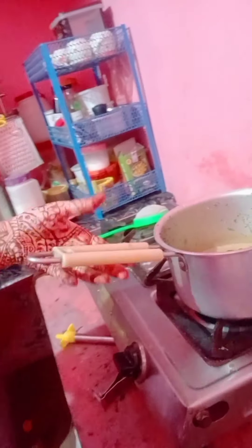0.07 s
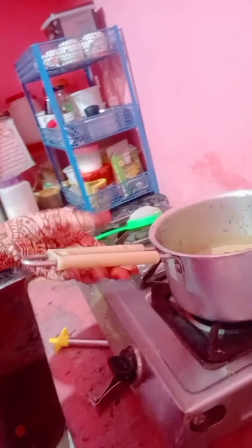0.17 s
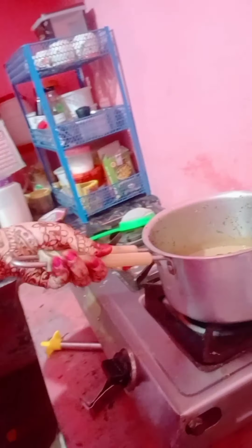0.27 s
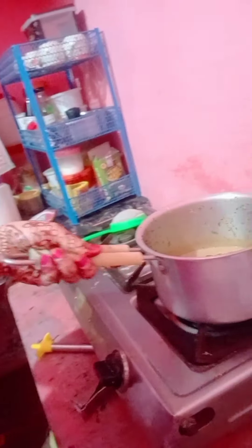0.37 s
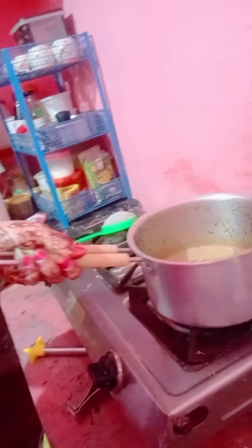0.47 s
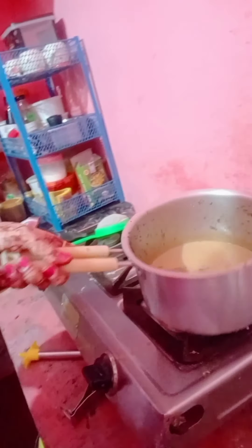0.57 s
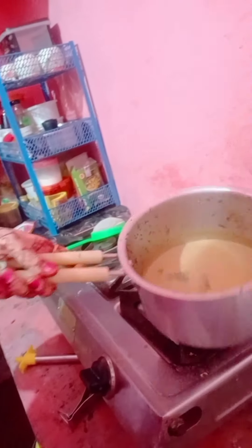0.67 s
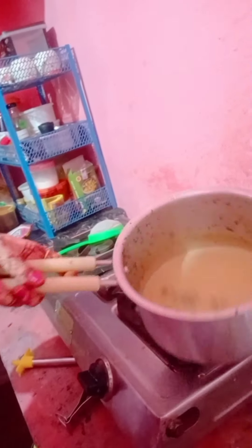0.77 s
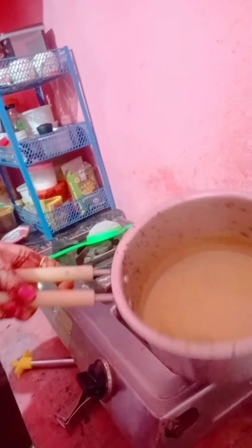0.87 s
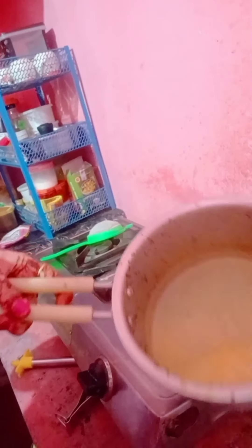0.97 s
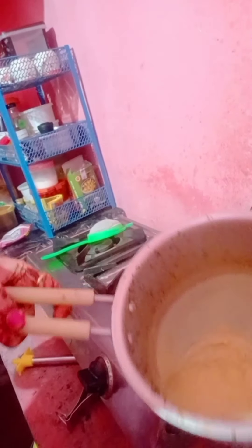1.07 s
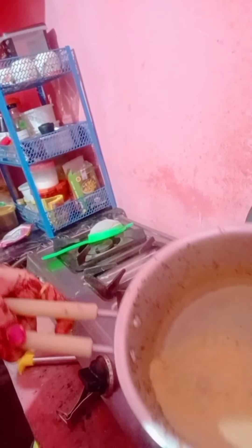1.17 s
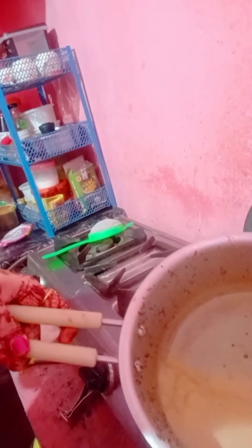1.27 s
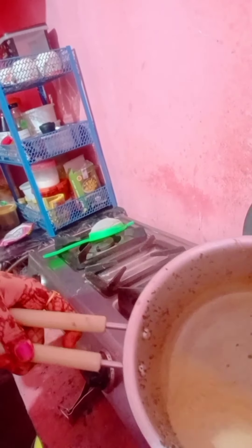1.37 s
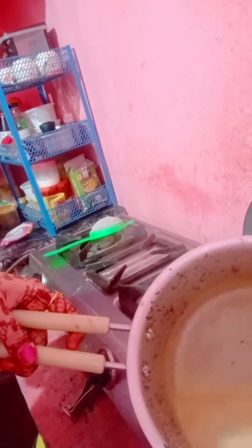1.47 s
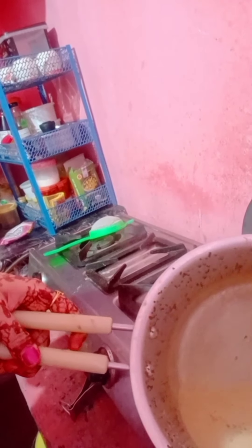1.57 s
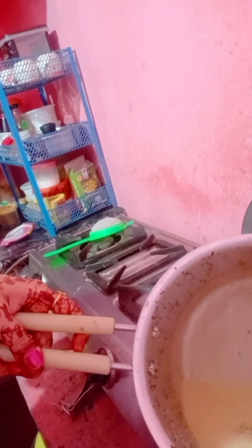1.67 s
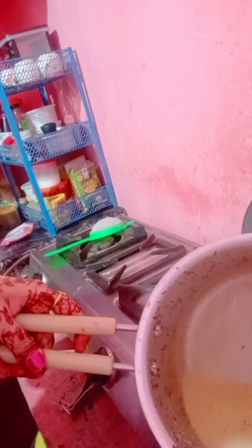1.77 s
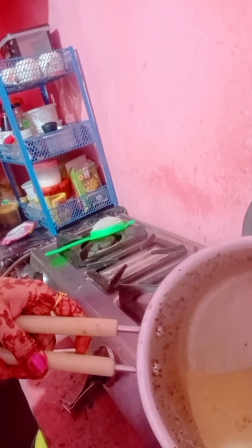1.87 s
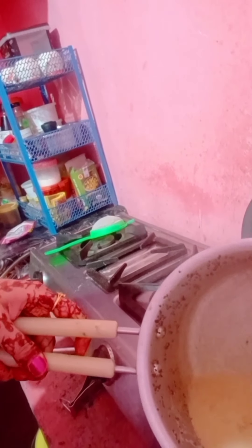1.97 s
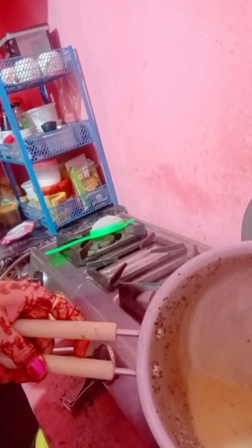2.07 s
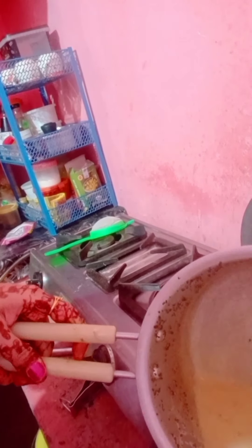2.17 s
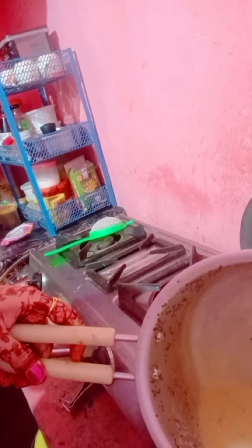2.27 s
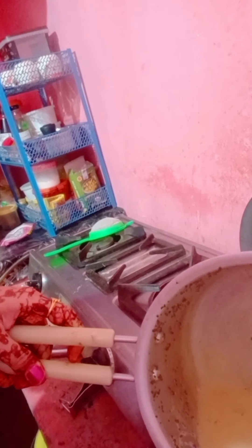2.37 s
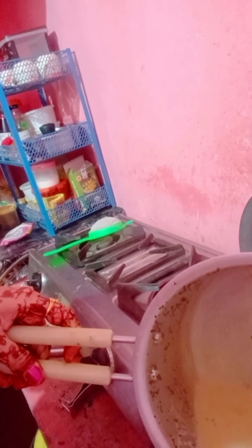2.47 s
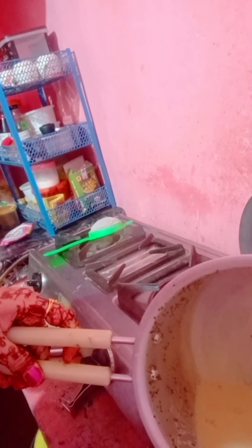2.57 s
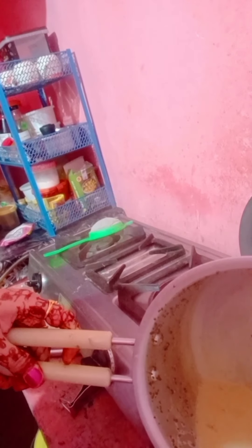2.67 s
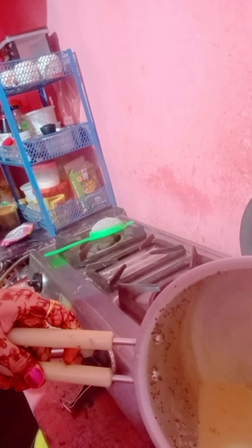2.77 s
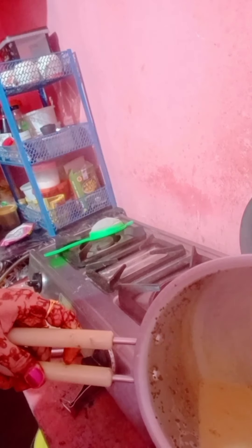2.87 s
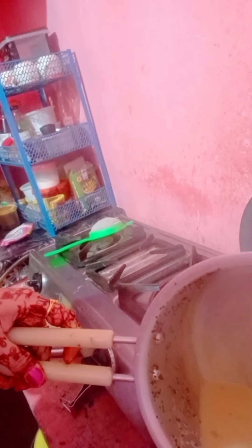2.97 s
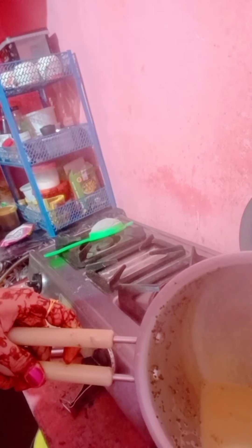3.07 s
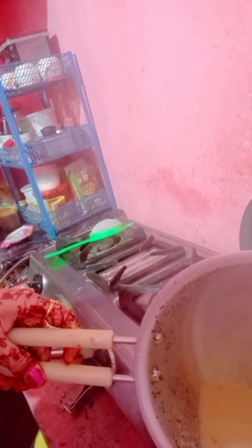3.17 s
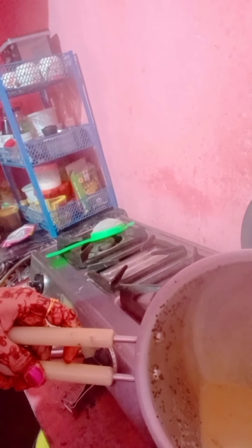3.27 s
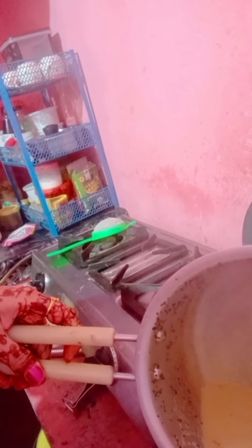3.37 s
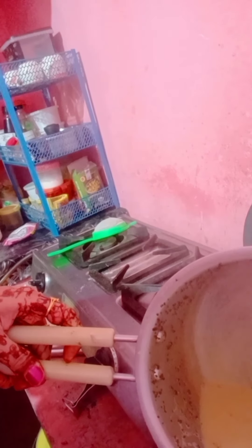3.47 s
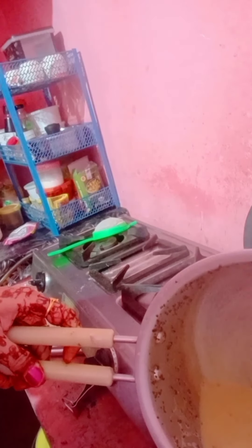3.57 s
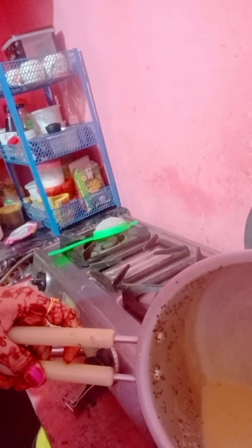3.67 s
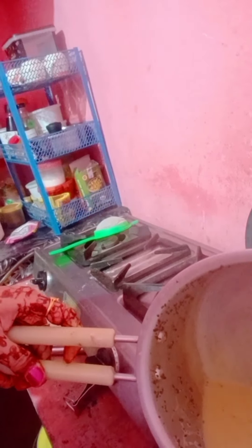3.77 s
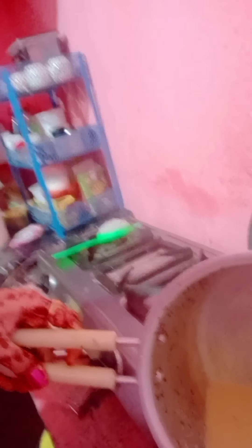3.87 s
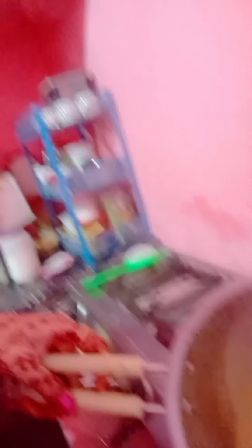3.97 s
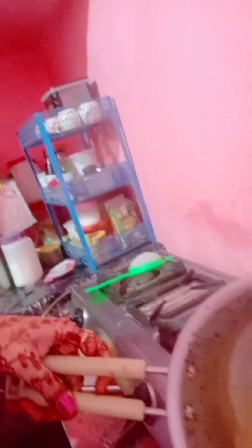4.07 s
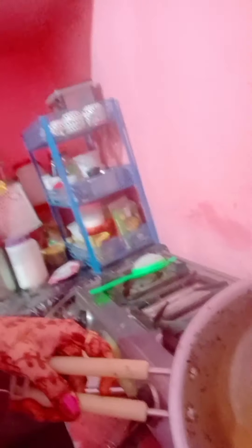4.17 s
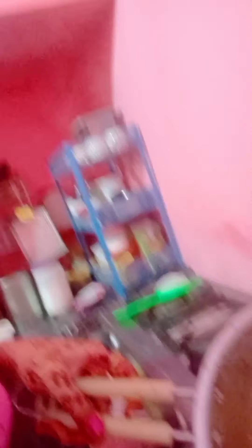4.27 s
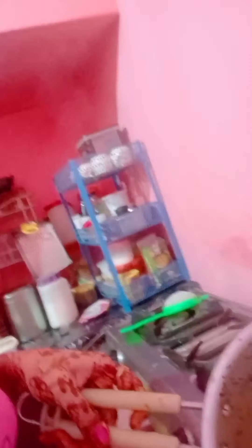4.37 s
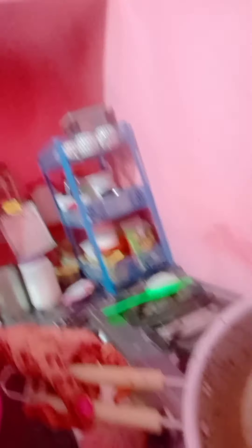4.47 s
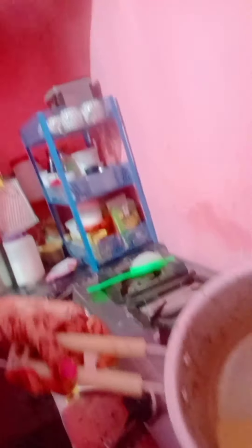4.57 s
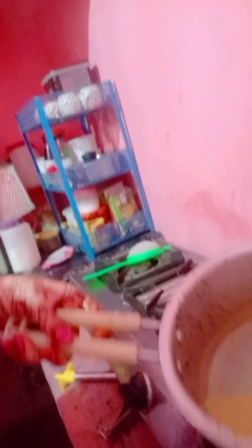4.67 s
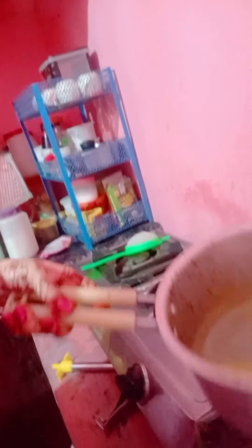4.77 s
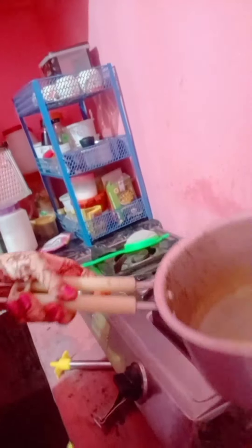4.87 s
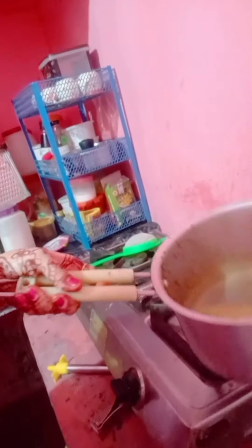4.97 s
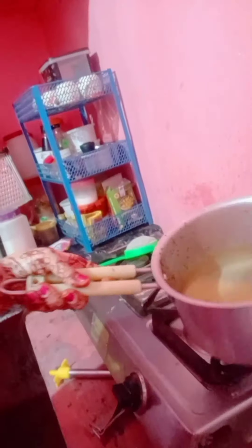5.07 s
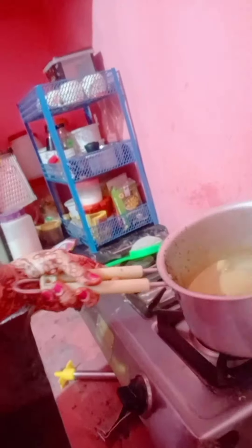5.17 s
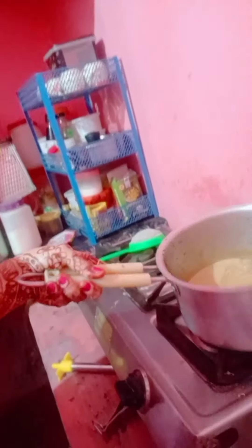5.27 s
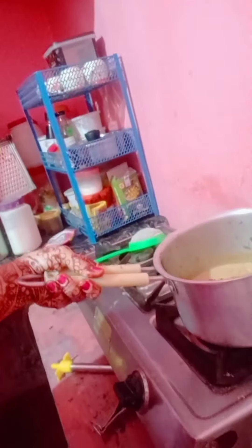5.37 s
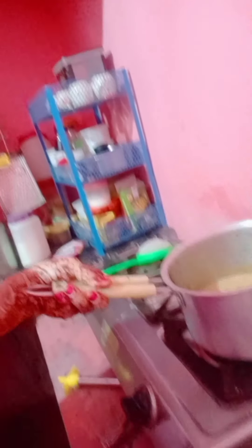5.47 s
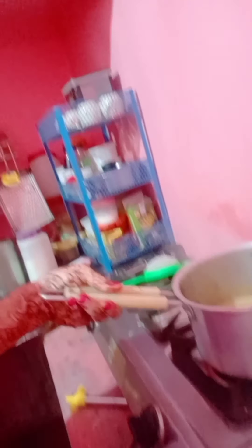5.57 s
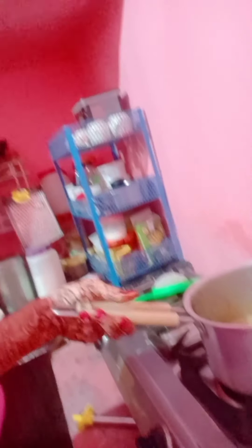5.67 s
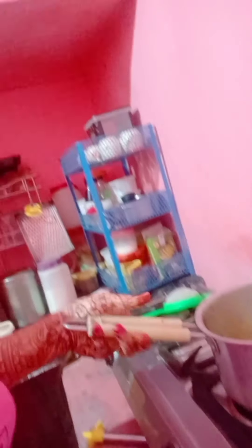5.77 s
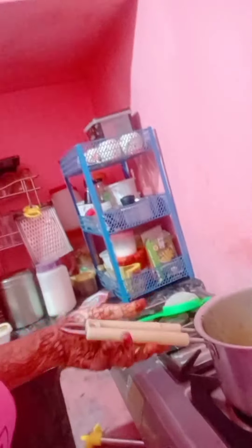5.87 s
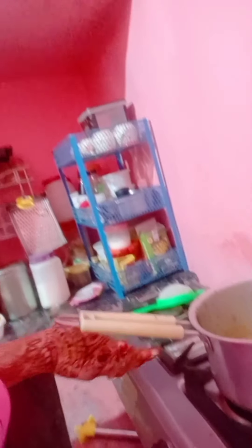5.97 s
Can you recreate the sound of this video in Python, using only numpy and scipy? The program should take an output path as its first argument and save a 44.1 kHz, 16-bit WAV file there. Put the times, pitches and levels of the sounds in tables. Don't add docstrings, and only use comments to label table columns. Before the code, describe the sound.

In a small, hard-walled kitchen, a full metal pot is tugged with hard clanks and scraped off an iron stove grate. A few quiet seconds follow, with soft sleeve rustles, bangle and tong ticks close to the phone, over a low wavering fan hum. Then the pot bangs down loudly on the stove, bounces, scrapes briefly and settles with bright knocks.

```python
import sys
import numpy as np
from scipy import signal
from scipy.fft import rfft, irfft, next_fast_len
from scipy.io import wavfile
from scipy.ndimage import uniform_filter1d

SR = 44100
rng = np.random.default_rng(int(sys.argv[2]) if len(sys.argv) > 2 else 0)


def to_linear_factor(level_db):
    exponent = np.asarray(level_db, float) / 20
    return 10 ** exponent


def transcribe(u):
    v = np.clip(np.atleast_2d(u).T, -1, 1)
    q = np.round(v * 32767).astype(np.int16)
    wavfile.write(sys.argv[1], SR, q)


N = 265041
T = np.arange(N) / SR


def unit(x):
    return x / np.sqrt(np.mean(x ** 2) + 1e-30)


def peak_unit(x):
    return x / np.abs(x).max()


def band(x, lo_hz, hi_hz):
    return signal.sosfilt(signal.butter(2, [lo_hz, hi_hz], "bandpass", fs=SR, output="sos"), x)


def ring(x, hz, width_hz):
    return signal.lfilter(*signal.iirpeak(hz, hz / width_hz, fs=SR), x)


def shape(x, points):
    hz, db = np.transpose(points)
    size = next_fast_len(x.shape[-1])
    f = np.maximum(np.arange(size // 2 + 1) * SR / size, 1)
    gain = to_linear_factor(np.interp(np.log(f), np.log(hz), db))
    return irfft(rfft(x, size) * gain, size)[..., :x.shape[-1]]


def walk(rate):
    k = int(SR / rate)
    steps = np.repeat(rng.standard_normal(N // k + 1), k)
    return 0.84 * uniform_filter1d(uniform_filter1d(steps, k), k)[:N]


def grains(rate, spread_db):
    hits = rng.random(N) < rate / SR
    return unit(hits * rng.standard_normal(N) * to_linear_factor(spread_db * rng.exponential(size=N)))


def decay(t, t60):
    return np.exp(-np.log(1000) * t / t60)


def swell(s, length_s, rise_s, fall_s):
    return np.exp(-np.maximum(s - T, 0) / rise_s - np.maximum(T - s - length_s, 0) / fall_s)


def add(out, s, x, pan_db):
    i = int(s * SR)
    x = x[:N - i]
    out[:, i:i + len(x)] += x * to_linear_factor([[pan_db / 2], [-pan_db / 2]])


# (frequency [Hz], density [dB per Hz])
AIR_COLOUR = [(15, -62.5), (25, -9.5), (54, -16.5), (128, 1.5), (237, -15.5), (363, -8), (462, -15),
              (978, -19), (1120, -15.5), (1580, -27.5), (2700, -26.5), (3540, -38.5), (6720, -33),
              (7600, -41.5), (7850, -68)]
# (frequency [Hz], width [Hz], level [dB rms])
CASING_MODES = [(69, 15, -102), (111.7, 9.9, -74.5), (138.2, 8.3, -65.5), (300, 16, -78),
                (383.3, 22, -83.5), (877, 6.9, -80), (1162, 71, -81), (1247, 11, -83.5), (1437, 39, -84),
                (2148, 50, -93.5), (2644, 50, -87.5)]


def air():
    mid, side = shape(rng.standard_normal((2, N)), AIR_COLOUR)
    gain = to_linear_factor(-63 - 3.5) / np.sqrt(np.mean(band(mid, 170, 8000) ** 2))
    side = gain * shape(side, [(100, -9), (300, -8.5), (1000, 2.0), (4000, 0.5)])
    mid = gain * mid
    for hz, width, db in CASING_MODES:
        tone = unit(ring(ring(rng.standard_normal(N), hz, width), hz, width))
        mid = mid + to_linear_factor(db + 2 * walk(9.6)) * tone
    both = np.array([to_linear_factor(0.76) * (mid + side), to_linear_factor(-1.0) * (mid - side)])
    flutter = 0
    for hz in (250, 400, 640, 1020, 1640, 2600, 4200):
        flutter = flutter + (to_linear_factor(2.2 * walk(9)) - 1) * band(both, hz, hz * 1.6)
    both = to_linear_factor(0.7 * walk(3)) * (both + flutter)
    mode_hz = np.arange(300, 8000, 45)
    depth_db = 3.0 * np.clip(mode_hz / 1500 - 0.2, 0, 1)
    sway = 2.5 * walk(2.5)
    one, two = (shape(both, np.transpose([mode_hz, depth_db * rng.standard_normal(len(mode_hz))]))
                for _ in range(2))
    return to_linear_factor(-0.67) * (np.cos(sway) ** 2 * one + np.sin(sway) ** 2 * two)


# (time [s], length [s], level [dB])
DRONE = [(1.137, 0.082, -58), (1.318, 0.085, -52), (1.57, 0.023, -57.5), (1.666, 0.16, -54),
         (1.864, 0.083, -54.5), (2.017, 0.036, -68), (2.177, 0.15, -56), (2.397, 0.1, -58.5),
         (2.565, 0.033, -56.5), (2.782, 0.082, -58), (3.001, 0.026, -63), (3.129, 0.066, -54),
         (3.31, 0.12, -53.5), (3.651, 0.11, -52.5), (3.804, 0.067, -55), (3.928, 0.093, -60),
         (4.049, 0.027, -55), (4.286, 0.074, -57), (4.417, 0.025, -52), (4.63, 0.059, -52.5),
         (4.786, 0.033, -56.5), (4.987, 0.068, -54.5), (5.143, 0.13, -57)]
# (time [s], length [s], level [dB], pitch [Hz])
DRONE_SHAKEN = [
    (0.086, 0.14, -50, 114.9),
    (0.363, 0.087, -51.5, 120.9),
    (0.521, 0.18, -59, 113.8),
    (0.757, .28, -56, 119.5),
    (5.338, 0.024, -56.5, 122),
    (5.504, 0.07, -47.5, 111.8),
    (5.606, .18, -53, 137.4),
    (5.949, 0.044, -58, 122),
]


def drone():
    swells = sorted([row + (122,) for row in DRONE] + DRONE_SHAKEN)
    s, length, _, hz = np.transpose(swells)
    pitch_hz = np.interp(T, s + length / 2, hz) + 1.53 * walk(16)
    phase = 2 * np.pi * np.cumsum(pitch_hz) / SR
    size = sum(to_linear_factor(db) * swell(s, length, 0.01, 0.0067) for s, length, db, _ in swells)
    lag_rad = np.array([[0.2], [0]])
    tone = np.sqrt(2) * np.sin(phase - lag_rad) * size * to_linear_factor(4.2 * walk(35) + 1.0)
    return tone * to_linear_factor([[0.8], [-0.8]])


# (frequency [Hz], t60 [s])
ROOM = [(150, 0.58), (400, 0.24), (1000, 0.17), (2500, 0.23), (5000, 0.18), (10000, 0.031)]
# (frequency [Hz], level [dB])
TAIL_WIDTH = [(60, -30.5), (150, -7.5), (300, -7.5), (600, -2), (1200, 1.5), (4000, 2.5), (12000, 10)]


def kitchen(x, wet_db, pan_db):
    t = T[:SR // 2]
    tail = 0
    for hz, t60 in ROOM:
        octave = band(rng.standard_normal((2, len(t))), hz / 1.69, hz * 1.39)
        tail = tail + octave / np.sqrt(hz * t60) * decay(t, t60)
    tail = tail * (1 - np.exp(-t / 0.00032)) / np.sqrt(np.sum(tail[0] ** 2))
    tail = rfft(tail[0] + shape(tail[1], TAIL_WIDTH) * np.array([[1], [-1]]))
    power = np.abs(tail) ** 2 + 1e-12
    even = uniform_filter1d(power.mean(axis=0), size=300) / uniform_filter1d(power, size=16, axis=1)
    tail = irfft(tail * np.sqrt(even), len(t))[:, :len(t) * 4 // 5]
    tail = tail * to_linear_factor([[pan_db], [-pan_db]])
    wet = signal.fftconvolve(x.mean(axis=0, keepdims=True), tail, axes=1)[:, :N]
    return x + to_linear_factor(wet_db) * wet


# (time [s], length [s], level [dB], fall [s])
RUMBLE = [
    (0.047, 0.25, -53, 0.044),
    (0.368, 0.38, -54.5, 0.12),
    (5.419, 0.0093, -39.5, 0.12),
    (5.57, 0.054, -56, 0.12),
]


def rumble():
    shudder = unit(band(band(rng.standard_normal(N), 93, 140), 48, 117))
    return shudder * sum(to_linear_factor(db + 1.0) * swell(s, length, 0.0077, fall_s) for s, length, db, fall_s in RUMBLE)


# (time [s], length [s], level [dB], duller part [dB])
RUSTLE = [(0.967, 0.11, -70.5, 4.5), (1.16, 0.12, -73, 9), (1.49, 0.18, -72, 8), (1.77, 0.22, -75.5, 10.5),
          (2.174, 0.27, -75, 11.5), (2.695, 0.03, -67, 2), (2.756, 0.22, -74, 9.5),
          (3.115, 0.23, -73, 11.5), (3.426, 0.082, -70, 13.5), (3.626, 0.083, -71.5, 10),
          (3.808, 0.12, -77, 14.5), (4.014, 0.099, -63, 5.5), (4.168, 0.093, -71.5, 7),
          (4.532, 0.031, -67, 5), (4.615, 0.089, -81.5, 14), (5.845, 0.056, -71.5, 24),
          (5.946, 0.042, -71, 14)]


def rustle():
    bright, dull = 0, 0
    for s, length, db, dull_db in RUSTLE:
        move = to_linear_factor(db) * swell(s, length, 0.024, 0.032)
        bright = bright + move
        dull = dull + move * to_linear_factor(dull_db - 5.5)
    one, two = (bright * unit(band(band(fibres, 4030, 7370), 3700, 7900)) + dull * unit(band(fibres, 1250, 2520))
                for fibres in (grains(4000, 1.6), grains(4000, 1.6)))
    return to_linear_factor(-5.5) * shape(np.array([one, 0.055 * one + 1.14 * two]), [(7600, 0), (7850, -18)])


# (time [s], level [dB peak], pitch [Hz], t60 [s])
BUMPS = [(0.099, -47, 505, 0.19), (0.461, -52, 333, 0.14), (1.208, -62, 398, 0.1), (1.588, -60, 631, 0.11),
         (3.48, -56.5, 533, 0.028), (3.639, -58, 530, 0.25), (4.069, -56, 467, 0.049),
         (4.179, -52, 434, 0.066), (4.533, -56, 207, 0.046), (4.545, -55.5, 70, 0.071),
         (4.89, -69, 70, .08)]
# (time [s], level [dB peak], pitch [Hz], t60 [s])
LOW_RING = [
    (0.072, -41, 347, 0.15),
    (0.214, -34.5, 366, 0.051),
    (0.348, -39.5, 376, 0.061),
    (0.621, -34, 377, 0.15),
    (5.564, -23.5, 348, 0.066),
    (5.714, -32, 338, 0.036),
    (5.765, -57, 360, 0.13),
]


def bumps():
    out, t = np.zeros((2, N)), T[:8000]
    for table, relative_width in ((BUMPS, 0.4), (LOW_RING, 0.08)):
        for s, db, hz, t60 in table:
            bump = ring(rng.standard_normal(len(t)), hz, hz * relative_width)
            bump = bump * decay(t, t60) * (1 - np.exp(-t / 0.0025))
            add(out, s, to_linear_factor(db - 0.5) * peak_unit(bump), 1.5)
    return out


# (time [s], level [dB peak], pitch [Hz])
TICKS = [
    (1.2065, -48, 1600),
    (1.5888, -61, 1660),
    (2.6938, -54.5, 2230),
    (3.4569, -59, 2250),
    (3.6584, -52.5, 1210),
    (4.0888, -74, 1650),
    (4.566, -51.5, 3000),
]
# (time [s], level [dB peak], pitch [Hz])
PINGS = [(0.9627, -54.5, 4840), (2.7243, -62, 5500), (2.9693, -57, 5300), (3.1164, -62, 3780),
         (3.4685, -57, 4200), (3.7124, -60, 4730), (3.8748, -48.5, 4445), (3.955, -58, 6200),
         (4.0935, -58, 3970), (4.5184, -62, 4400), (5.1292, -61, 6900)]
# (time [s], level [dB peak], pitch [Hz])
SNAPS = [(3.4905, -46.5, 7000), (4.015, -43.5, 6000), (4.0465, -43.5, 5900), (4.2044, -48, 7500),
         (3.469, -48, 7000), (4.093, -52, 6960)]
# (time [s], level [dB peak], pitch [Hz])
CREAKS = [(2.9327, -58, 6440), (3.2261, -76, 3160), (3.2495, -57, 3770), (3.3867, -60, 4710),
          (3.421, -64, 3880), (3.6232, -63, 6540), (3.6576, -63, 3760), (3.857, -70, 4116),
          (4.1225, -67, 3130), (4.151, -57, 5390), (4.5794, -74, 3060)]


def ticks():
    out, t = np.zeros((2, N)), T[:8000]
    # table, band edges as parts of the pitch, t60 [s], share of pure tone
    kinds = ((TICKS, 0.6, 1.7, 0.016, 0.15), (PINGS, 0.75, 1.35, 0.016, 0.08),
             (SNAPS, 0.3, 1.9, 0.012, 0.05), (CREAKS, 0.65, 1.5, 0.01, 0.1))
    for table, below, above, t60, tone in kinds:
        for s, db, hz in table:
            fade = decay(t, t60)
            snap = rng.standard_normal(len(t)) * fade ** 1.6 + 5.6 * (t == 0)
            snap = band(band(snap, hz * below, hz * above), hz * below, hz * above)
            note = np.sin(2 * np.pi * hz * t) * fade * tone
            add(out, s - 0.0003, to_linear_factor(db + 6.5) * (note + 0.46 * peak_unit(snap)), 1.5)
    return out


# (time [s], level [dB peak],
# pitch [Hz], t60 [s])
RINGS = [(0.054, -30.5, 1250, 0.097), (0.051, -31.5, 790, 0.12), (0.054, -47, 1500, 0.08),
         (0.0817, -36, 533, 0.28), (0.07, -40.5, 339, 0.52), (0.199, -40, 2200, 0.07),
         (0.206, -40, 1100, 0.07), (0.24, -47, 2420, 0.078), (0.24, -47.5, 2090, .08),
         (0.329, -31, 780, 0.18), (0.33, -42, 1270, 0.12), (0.77, -35.5, 1075, .09),
         (0.74, -66, 3270, 0.25), (5.407, -33.5, 770, 0.11), (5.408, -20.5, 800, 0.13),
         (5.41, -25, 600, 0.2), (5.432, -22, 620, 0.3), (5.42, -35, 520, 0.3), (5.415, -35.5, 290, 0.29),
         (5.42, -29.5, 1670, 0.18), (5.412, -37, 1200, .08), (5.41, -42, 3600, .15), (.33, -37, 1700, 0.09),
         (5.407, -29, 1250, .05), (5.41, -33, 1840, .25), (5.41, -43, 2900, 0.3), (5.482, -25.5, 2160, .1),
         (5.483, -42, 2600, .05), (5.508, -38, 2300, .08), (5.487, -38.5, 3610, 0.12),
         (5.493, -31, 830, 0.083), (5.505, -26, 620, 0.12), (5.55, -39, 930, .1), (5.575, -29.5, 377, 0.12),
         (5.7145, -19.5, 2090, 0.075), (5.713, -22.5, 2700, 0.049), (5.713, -25, 1656, 0.059),
         (5.716, -34.5, 310, 0.26), (5.741, -28.5, 2440, 0.096), (5.752, -21, 2100, 0.05),
         (5.762, -38, 314, 0.089), (5.815, -42, 2120, .08), (5.875, -52, 2600, 0.14),
         (.095, -46.5, 165, .3), (.21, -47, 180, 0.34), (.78, -51, 160, 0.31), (5.53, -40.5, 170, 0.35),
         (0.328, -38.5, 1940, 0.087), (0.435, -37.5, 770, .08), (0.47, -43, 1100, .08),
              (0.565, -47, 1400, .08), (0.6, -51.5, 2250, .12), (0.625, -53, 2200, .1),
              (0.687, -41, 730, .07), (0.707, -40, 990, .07), (0.77, -34, 760, 0.084),
              (0.8, -41.5, 1080, .08), (0.772, -47, 1900, .07), (5.546, -36, 2900, 0.051),
              (5.572, -34, 2000, .08), (5.592, -37, 1300, .07), (5.6, -34, 380, 0.14),
              (5.736, -29.5, 1060, 0.074), (5.728, -39, 3380, .12), (5.715, -41, 3680, .15),
              (5.715, -46, 4900, .17), (5.716, -44, 5500, .15), (5.74, -43, 4300, 0.11),
              (5.79, -40, 940, .12), (5.73, -38, 560, .16), (0.67, -43, 690, .08), (0.41, -42, 300, .12),
              (0.63, -44.5, 410, .2)]
# (time [s], level [dB peak], pitch [Hz])
TINKS = [(1.176, -61, 6900), (1.207, -54, 2400), (1.208, -54, 1750), (1.214, -62, 2000), (1.241, -64, 2720),
         (1.242, -70, 5200), (1.592, -66, 4600), (2.75, -63, 2800), (2.855, -64, 4800), (2.894, -68, 4900),
         (3.115, -60, 3700), (3.288, -63, 4600), (3.29, -62, 2680), (3.32, -61, 2300), (2.705, -63, 2200),
         (2.97, -64, 4900), (4.566, -62, 3800), (1.09, -66, 4500), (3.454, -65, 4000), (3.874, -57, 4250),
         (3.957, -60, 6400), (4.533, -64, 3500), (4.534, -68, 5000), (4.26, -70, 6400)]


def rings():
    out, t = np.zeros((2, N)), T[:SR // 2]
    for s, db, hz, t60 in RINGS + [tink + (0.028,) for tink in TINKS]:
        pair = np.sin(2 * np.pi * hz * t) + 0.19 * np.sin(2 * np.pi * hz * 1.03 * t)
        add(out, s, to_linear_factor(db) * pair * decay(t, t60) * (1 - np.exp(-t / 0.002)), 1.2)
    return out


# (time [s], level [dB peak])
CRACKS = [
    (0.057, -43),
    (0.327, -56),
    (5.404, -38.5),
    (5.71, -42.5),
]


def cracks():
    out, t = np.zeros((2, N)), T[:SR // 2]
    for s, db in CRACKS:
        crack = band(rng.standard_normal(len(t)) * np.exp(-t / 0.0012), 7500, 12500)
        add(out, s, to_linear_factor(db) * peak_unit(crack), 1.0)
    return out


# (frequency [Hz], density [dB per Hz])
SHEET = [(88, -72.5), (150, 19.5), (221, -4), (371, 8), (459, -3.5), (612, -4), (661, -2.5), (802, -2),
         (1460, -10), (2100, -21), (3890, -27), (5610, -25.5), (15000, -48.5)]
# (time [s], level [dB])
SLIDE = [
    [(0.49, -52), (0.545, -50), (0.562, -41.5), (0.6, -39), (0.63, -43.5), (0.67, -41.5), (0.716, -39),
     (0.762, -43.5), (0.8, -43.5), (0.86, -60)],
    [(5.51, -48), (5.546, -29.5), (5.598, -26.5), (5.662, -62), (5.7, -36)],
]
# (frequency [Hz], width [Hz], level [dB])
SLIDE_BODY = [
    [(371, 30, 9.5), (560, 58, 9), (765, 80, 13.5), (935, 61, 6), (1490, 48, -2), (2140, 150, -5)],
    [(610, 45, -9), (370, 21, 5.5), (794, 26, -10), (1000, 120, -28), (1250, 43, -29), (1300, 31, -14),
     (2090, 1000, -11), (2080, 240, -21), (2980, 22, -18)],
]
# (grit at start [dB], grit slope [dB per s], boom at
# start [dB], boom slope [dB per s])
SLIDE_WEAR = [
    (-2.5, -69, 2, -48),
    (-11, -33, -4, 8),
]
# (frequency [Hz], width [Hz], level [dB])
GRIT = [(2940, 290, -9), (3690, 26, 1.5), (4320, 43, 0), (5000, 61, -6), (6300, 390, -6), (6750, 88, -19)]


def slide():
    clicks, sand = grains(2500, 1.5), grains(4000, 2.2)
    rim = unit(sum(to_linear_factor(db) * ring(sand, hz, 2.0 * width) for hz, width, db in GRIT))
    grit = rim + to_linear_factor(-4.5) * unit(band(sand, 3700, 7000))
    out, judder_db = 0, 1.5 * walk(70)
    for path, peaks, (grit_db, grit_slope, boom_db, boom_slope) in zip(SLIDE, SLIDE_BODY, SLIDE_WEAR):
        s, db = np.transpose(path)
        since = np.clip(T - s[0], 0, s[-1] - s[0])
        body = unit(sum(to_linear_factor(peak_db) * ring(clicks, hz, width) for hz, width, peak_db in peaks))
        body = body + to_linear_factor(-3) * unit(band(shape(clicks, SHEET), 300, 3000))
        boom = to_linear_factor(boom_db + boom_slope * since) * unit(band(body, 227, 460))
        body = unit(band(body, 506, 2000)) + boom
        gate = np.interp(T, [s[0], s[0] + 0.03, s[-1] - 0.02, s[-1]], [0, 1, 1, 0])
        pressure = gate * to_linear_factor(np.interp(T, s, db) - 8.5 + judder_db)
        out = out + pressure * (body + to_linear_factor(grit_db + grit_slope * since - 6.5) * grit)
    return out * to_linear_factor([[1.1], [-1.1]])


def blows(table, modes, ring_scale, dense_db, dense_t60, crack_s, lead_db, lead_t60, trim_db, pan_db,
          late_s, rattle_s):
    out, t = np.zeros((2, N)), T[:SR // 2]
    hz, width, db = np.array(modes).T[:, :, None]
    for s, peak_db, clang_db, crack_db, lead_hz in table:
        luck = rng.standard_normal((2, len(modes), 1))
        fade = np.exp(-np.pi * np.maximum(width, 35) * ring_scale * t)
        swing = np.sin(2 * np.pi * hz * (1 + 0.014 * luck[1]) * t) * fade
        clear = unit(np.sum(to_linear_factor(db + 1.36 * luck[0]) * width * swing, axis=0))
        lead = unit(np.sin(2 * np.pi * lead_hz * t) * decay(t, lead_t60))
        chatter = (rng.random(4000) < 0.006) * rng.exponential(size=4000) * np.exp(-t[:4000] / rattle_s)
        chatter[0] = 2.5
        hit = decay(t, dense_t60) + 4.25 * np.exp(-t / crack_s)
        shake = signal.fftconvolve(hit, chatter)[:len(t)]
        dense = unit(shape(rng.standard_normal(len(t)), SHEET) * shake)
        clear, dense, lead = np.array([clear, dense, lead]) * (1 - np.exp(-t / 0.00063))
        x = clear + to_linear_factor(dense_db) * dense + to_linear_factor(lead_db) * lead
        low = peak_unit(band(x, 451, 1590))
        clang = peak_unit(band(band(x, 1690, 3300), 1330, 2660))
        crack = peak_unit(band(band(clear + 0.64 * dense, 2600, 11700), 2940, 15400))
        blow = low + to_linear_factor(clang_db) * clang + to_linear_factor(crack_db) * crack
        add(out, s + late_s, to_linear_factor(peak_db + trim_db) * blow, pan_db)
    return out


# (time [s], level [dB peak], clang 1.7-2.7 kHz [dB], crack 3-12 kHz [dB], lead mode
# [Hz])
LIFT = [
    (0.052, -22.5, -3, -4.5, 1070),
    (0.058, -29, 2.5, -16, 794),
    (0.193, -35.5, 4, -1.5, 1180),
    (0.204, -35, 2, -10, 1270),
    (0.237, -48.5, 3, 1, 830),
    (0.327, -23, -2.5, -5.5, 781),
    (0.435, -28.5, -3.5, -12, 754),
    (0.4495, -38.5, -1, -12, 1343),
    (0.769, -32.5, -32, -18.5, 1070),
]
# (frequency [Hz], width [Hz], level [dB])
GRATE = [(340, 29, 3), (781, 36, 2), (944, 61, 4.5), (1227, 50, 3.5), (1491, 45, -7), (1827, 180, -6),
         (2070, 13, -2), (2200, 55, -10), (3000, 35, -29), (3240, 16, -50), (3400, 17, -26),
         (3405, 60, -27.5), (4260, 20, -23), (4510, 14, -21), (5300, 43, -32), (5170, 15, -38),
         (5600, 140, -46), (6200, 49, -29), (5900, 24, -40.5), (6730, 110, -34)]


def lift_off():
    return blows(LIFT, GRATE, ring_scale=0.98, dense_db=4.3, dense_t60=0.41, crack_s=0.0032, lead_db=-19.5,
                 lead_t60=0.074, trim_db=-4, pan_db=1.5, late_s=0.0004, rattle_s=0.0069)


# (time [s], level [dB peak], clang [dB], crack [dB], lead mode [Hz])
DROP = [
    (5.405, -11.5, 2.5, -8.5, 786),
    (5.411, -17, -30, -27, 805),
    (5.423, -23, -33, 0, 820),
    (5.443, -23, -23, -10, 590),
    (5.482, -23, 5.5, -3, 1260),
    (5.546, -28.5, 4, 2.5, 1000),
]
# (frequency [Hz], width [Hz], level [dB])
STOVE = [(344, 61, 5), (615, 46, 8), (781, 140, 7), (1070, 92, 5), (1247, 69, -1.5), (1933, 44, -8.5),
         (2230, 120, -6), (2388, 58, -10), (2800, 21, -26), (2720, 15, -9.5), (3350, 86, -17.5),
         (3086, 16, -11), (3610, 25, -17), (4080, 41, -17.5), (5000, 34, -44), (6000, 140, -24),
         (6300, 28, -36), (5600, 56, -32)]


def bang_down():
    return blows(DROP, STOVE, ring_scale=0.66, dense_db=1.2, dense_t60=0.33, crack_s=0.0037, lead_db=-26,
                 lead_t60=0.053, trim_db=-3, pan_db=0.27, late_s=-0.0004, rattle_s=0.0062)


# (time [s], level [dB peak], clang [dB], crack [dB], lead mode [Hz])
SETTLE = [
    (5.711, -19, 4.5, 4.5, 2080),
    (5.72, -36, 15, -38, 2070),
    (5.738, -17, -2, -14, 1050),
    (5.753, -45.5, -25, -33, 2090),
    (5.767, -22, -39, -13, 1090),
]
# (frequency [Hz], width [Hz], level [dB])
POT = [(366, 114, -9), (636, 66, -13), (786, 73, -0.5), (1090, 190, 0.5), (1270, 17, 13), (1680, 30, 3.5),
       (2080, 54, -3), (2330, 30, -5), (2470, 55, -28), (2860, 24, -4), (3340, 57, -8.5), (3270, 123, -27),
       (3520, 98, -19), (4170, 160, -7), (5130, 110, -11.5), (5530, 51, -35), (5800, 33, -35),
       (6700, 110, -55)]


def settle():
    return blows(SETTLE, POT, ring_scale=3.96, dense_db=2.2, dense_t60=0.34, crack_s=0.0031, lead_db=-5.0,
                 lead_t60=0.013, trim_db=-5.0, pan_db=2.7, late_s=0.001757, rattle_s=0.01)


def scene():
    background = air() + drone() + rumble()
    hand = rustle() + kitchen(ticks() + bumps(), -6, 0.9)
    ringing = kitchen(rings() + cracks(), -10.0, 0.44)
    metal = kitchen(lift_off() + bang_down() + settle() + slide(), -4.0, 0.22)
    return background + hand + ringing + metal


def top_cut(x):
    return signal.sosfilt(signal.butter(12, 15730, fs=SR, output="sos"), x)


# (frequency [Hz], gain [dB])
FAR_PORT = [(2500, 0), (4400, -2.5), (9000, -4), (14000, 3.5)]
# (frequency [Hz], gain [dB])
MIC = [(20, -32), (45, -5.5), (200, -6), (400, -3.5), (2500, 2.5), (4000, -0.5), (7500, -1.5), (7850, -11),
       (9000, -13), (11000, -16.5), (15500, -10.5)]


def record(dry):
    hiss = to_linear_factor(-92.0) * rng.standard_normal(dry.shape)
    ports = np.array([dry[0], shape(dry[1], FAR_PORT)])
    limit = 0.5
    mix = limit * np.tanh(shape(ports, MIC) / limit) + hiss
    return top_cut(mix)


dry = scene()
out = record(dry)
transcribe(out)
```